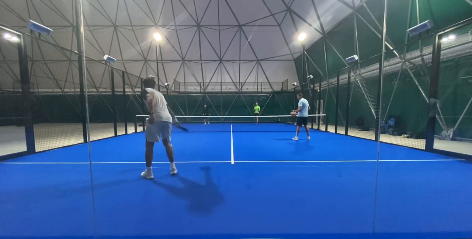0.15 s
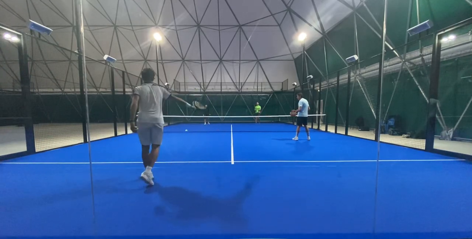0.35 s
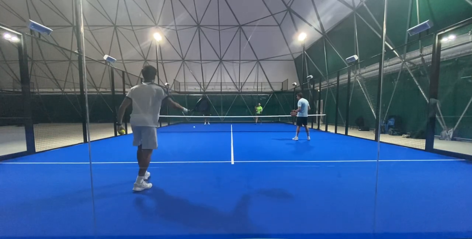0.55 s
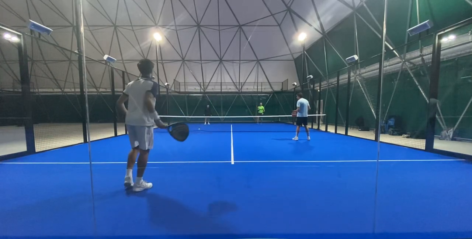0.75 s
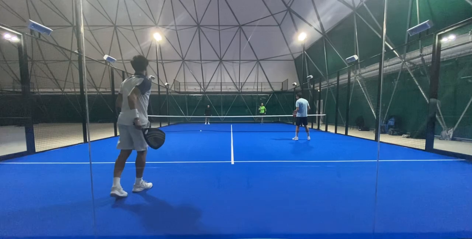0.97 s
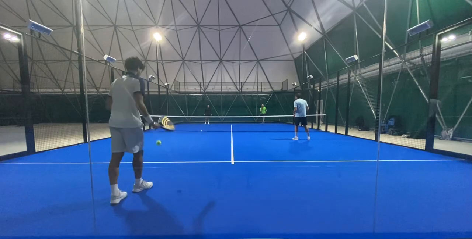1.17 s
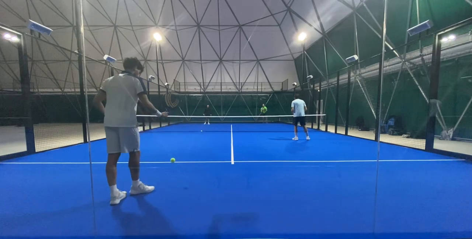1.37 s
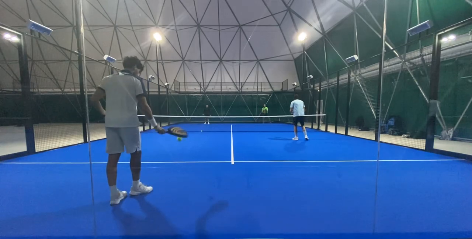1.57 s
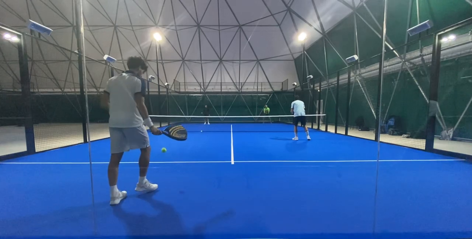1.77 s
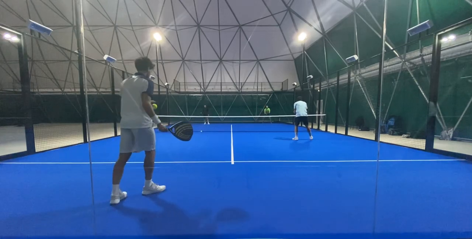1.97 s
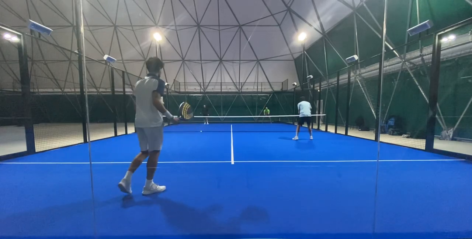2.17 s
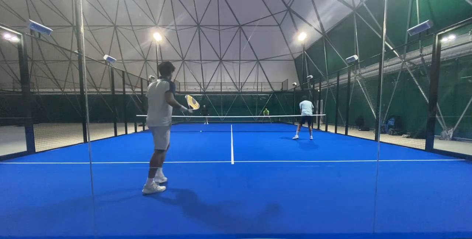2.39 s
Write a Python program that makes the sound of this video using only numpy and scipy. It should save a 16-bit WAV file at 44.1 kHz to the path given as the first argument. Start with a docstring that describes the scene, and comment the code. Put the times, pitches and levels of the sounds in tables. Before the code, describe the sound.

One loud racket pop right at the start, heard from a distance in a big hard-walled indoor court, blooms into long reverberation; later two dull bounces, the second barely audible, above a low wavering hum.

```python
"""Racket strike in a domed hall

A racket strikes a ball some way off in a large domed sports hall; two soft bounces follow.
Each knock is decaying modes plus a click. Its direct sound is weak: walls and roof send back
bunched echoes of shaped noise, then a long tail that dulls as it dies.
Ventilation hums low, as wavering sines, under the steady filtered-noise wash of the hall."""
import sys
import numpy as np
from scipy import signal
from scipy.fft import rfft, irfft
from scipy.io import wavfile
from scipy.ndimage import uniform_filter1d

SR = 44100
rng = np.random.default_rng(int(sys.argv[2]) if len(sys.argv) > 2 else 0)


def transcribe(u):
    """Save the signal u as a 16-bit wav file named by the first command-line argument.

    u: samples, shape (n,) or (channels, n), limited to [-1, 1]; the rate is SR.
    q: integer samples, one column per channel.
    """
    v = np.clip(np.atleast_2d(u).T, -1, 1)
    q = np.round(v * 32767).astype(np.int16)
    wavfile.write(sys.argv[1], SR, q)


def undo_db(level):
    """Turn decibels back into plain size, where 20 dB means ten times bigger."""
    steps = np.asarray(level, float) / 20
    return 10 ** steps


N = 107295  # samples, about 2.4 s


def evened(x):
    """Scales a sound to an rms of one."""
    return x / np.sqrt(np.mean(x ** 2) + 1e-20)


def unit(x):
    """Scales a sound to an energy of one."""
    return x / np.linalg.norm(x)


def read(points, hz):
    """Reads a curve of (Hz, value) points along a logarithmic frequency axis."""
    f, value = np.transpose(points)
    return np.interp(np.log(hz + 1), np.log(f + 1), value)


def panned(level_db, pan_db):
    """Left and right gains for a level and a left-minus-right difference."""
    return undo_db(level_db + np.array([[pan_db], [-pan_db]]) / 2)


def slow_waver(rate_hz):
    """Irregular waver of unit rms: twelve sines with random phases, up to the given rate."""
    t = np.arange(N)[:, None] / SR
    rates = np.geomspace(0.1, 1, num=12) * rate_hz
    return evened(np.sin(2 * np.pi * (rates * t + rng.random(12))).sum(1))


def noise_pair(shape):
    """Stereo noise, most alike in the bass, coloured over time by shape(hz, seconds) in dB."""
    # likeness of left and right: hz, correlation
    likeness = [(60, 0.77), (130, 0.92), (270, 0.76), (570, -0.26), (1200, -0.15), (2540, 0.043),
                (5400, 0.059), (11400, -0.031)]
    patchy_db = 1.5
    frames, hz = N // 256 + 5, np.fft.rfftfreq(1024, 1 / SR)[:, None]
    a, b, c, d, patches = rng.standard_normal((frames, 513, 5)).T
    patches = uniform_filter1d(uniform_filter1d(patches, size=10, axis=0), size=10, axis=1)
    same = np.clip(read(likeness, hz), -1, 1)
    left = a + 1j * b
    right = same * left + np.sqrt(1 - same ** 2) * (c + 1j * d)
    level_db = shape(hz, np.arange(frames) * 256 / SR) + patchy_db * evened(patches)
    spectra = np.array([left, right]) * undo_db(level_db)
    return signal.istft(spectra, nperseg=1024, noverlap=768)[1][:, :N]


def ventilation():
    """Low hum of a gliding tone and fainter wavering ones, over a steady wash of coloured noise."""
    # path of the main hum: time_s, pitch_hz, level_db
    main_hum = [(0.0, 57.65, -37), (0.68, 56.65, -43), (0.801, 57.2, -38.5), (0.83, 59.8, -64.5),
                (0.99, 67.92, -38), (1.18, 69.96, -38), (1.38, 70.16, -37.5), (1.5, 73.1, -41),
                (1.541, 68.5, -52), (1.61, 61.2, -41), (1.73, 64.5, -39.5), (1.851, 61, -46),
                (1.979, 53.5, -41.5), (2.079, 52, -42), (2.13, 57, -35), (2.19, 62.6, -41), (2.43, 63, -53)]
    # fainter tones: pitch_hz, level_db, waver_hz (rms)
    faint_hums = [(46.7, -48, 2.4), (104.7, -52, 5.34), (132.7, -63.5, 10)]
    # colour of the wash: hz, relative_db
    wash_colour = [(18, -59.5), (25, -39), (48, -7), (70, 2.5), (102, -4.5), (183, -12.5), (305, -13.5),
                   (387, -23), (600, -22.5), (800, -16), (1470, -23.5), (2500, -34), (4000, -47.5),
                   (6500, -61.5), (9000, -68), (12000, -76), (16000, -110)]
    wash_db, throb_db = -39, 0.5  # overall rms of the wash; rms throb of each tone
    waver_rate_hz, throb_rate_hz = 8.1, 27.0
    time_s, pitch_hz, level_db = np.transpose(main_hum)
    t = np.arange(N) / SR
    tones = [(np.interp(t, time_s, pitch_hz), np.interp(t, time_s, level_db))]
    for f, db, waver_hz in faint_hums:
        tones.append((f + waver_hz * slow_waver(waver_rate_hz), db))
    hum = 0
    for f, db in tones:
        gain = np.sqrt(2) * undo_db(db + throb_db * slow_waver(throb_rate_hz))
        hum = hum + gain * np.sin(2 * np.pi * np.cumsum(f) / SR)
    wash = evened(noise_pair(lambda hz, s: read(wash_colour, hz) + 0 * s))
    return hum + undo_db(wash_db) * wash


def hall(echoes_db):
    """Paths for ring, thud and crack: bunched echoes that lose treble on the way, and a long tail."""
    # bunches of echoes: delay_s, length_s, left_minus_right_db, ring_db, thud_db, crack_db
    echoes = [(.005, 0.016, -1, 2.5, -1, -13.5), (0.015, 0.018, 4, 2, 2, -16),
              (0.027, 0.0075, -1, -2, -9, -17), (0.034, 0.011, -6, -7.5, -19, -2),
              (.056, 0.011, -1, -19, -14, -1.5), (.059, 0.027, -10.5, 0, -8, -12),
              (0.074, 0.013, -5, -5, -18, -15.5), (.1, 0.0077, -5, -22, -4.5, -23),
              (0.112, 0.0068, -4.5, -25, -19, 0), (.133, 0.013, 1, -12, 4.5, -11.5),
              (.163, .012, -10.5, -3, -11, -6), (.172, 0.011, 4, 1.5, -10, -17),
              (0.181, .014, -6.5, -1.5, -11, -15), (0.19, 0.018, -14.5, 4.5, 0, -17),
              (0.199, 0.026, 5, 3.5, -6, -16), (0.233, .023, -2, 5, -1.5, -23),
              (0.382, .05, -6, -6.5, -2, -19), (0.55, 0.067, 6.5, -4, -24, -23)]
    # decay of the hall: hz, t60_s
    decay = [(150, 2.6), (300, 1.94), (600, 4.83), (1000, 4.05), (2000, 4.33), (4000, 2.89), (7000, 1.36),
             (11000, 0.8), (15000, 0.54)]
    # for ring, thud, crack: level of the tail, and of the clean first reflection against its bunch
    mix_db = [(7.5, 0.5), (-15.5, 4), (13.5, -19.5)]
    tail_build_s = 0.067
    echo_rise = 0.18  # share of a bunch's length
    far_lag = 20  # samples by which the quieter, far side hears a first reflection later
    t = np.arange(N) / SR
    tail = noise_pair(lambda hz, s: -60 * s / read(decay, hz))
    tail = tail / np.linalg.norm(tail[0]) * (1 - np.exp(-t / tail_build_s))

    def treble_loss(hz, s):
        return np.minimum(60 * s * (1 / read(decay, 1000) - 1 / read(decay, hz)), 0)

    taps = noise_pair(treble_loss)
    taps = taps / taps[:, :8192].std()
    bunches, first_taps = [], []
    for delay_s, length_s, pan_db, *_ in echoes:
        age = np.maximum(t[:SR] - delay_s, 0) / length_s
        bunches.append(unit((1 - np.exp(-age / echo_rise)) * np.exp(-2 * age)))
        far = np.array([[pan_db < 0], [pan_db >= 0]])
        first_taps.append(np.arange(N) == round(delay_s * SR) + far * far_lag)
    paths = []
    for part, (tail_db, first_db) in enumerate(mix_db):
        gains = [panned(echoes_db + row[3 + part], row[2]) for row in echoes]
        power = sum((bunch * gain) ** 2 for bunch, gain in zip(bunches, gains))
        diffuse = taps * np.sqrt(np.pad(power, ((0, 0), (0, N - SR))))
        firsts = sum(gain * tap for gain, tap in zip(gains, first_taps))
        paths.append(diffuse + undo_db(tail_db) * tail + undo_db(first_db) * firsts)
    return paths


def ring(modes, swell_s):
    """Modes that swell together while each decays, cleared of bass below the lowest."""
    t = np.arange(8192) / SR
    swell = np.sin(np.pi / 2 * np.minimum(t / swell_s, 1)) ** 2
    sound = swell * sum(undo_db(db - 60 * t / t60) * np.sin(2 * np.pi * hz * t) for hz, db, t60 in modes)
    low_cut = signal.butter(2, min(modes)[0] / 2, "high", fs=SR, output="sos")
    return unit(signal.sosfilt(low_cut, sound))


def crack(top_hz):
    """One click with a causal, minimum-phase colour; a soft knock has a duller one."""
    # colour of the crack: hz, relative_db
    crack_colour = [(88, -45), (150, -22.5), (279, -5.5), (388, -6), (569, -13.5), (835, -10), (1390, -10),
                    (2200, -18.5), (3500, -25), (5000, -29.5), (7000, -29.5), (9000, -39.5), (11800, -47),
                    (13500, -57.5), (15400, -58), (22000, -110)]
    hz = abs(np.fft.fftfreq(8192, 1 / SR))
    log_gain = read(crack_colour, hz) * np.log(10) / 20 - np.log(1 + (hz / top_hz) ** 4) / 2
    spectrum = np.exp(np.conj(signal.hilbert(log_gain)))
    return unit(np.fft.ifft(spectrum).real[:4096])


def hit(knock, ring_modes, thud_modes, contact_s, top_hz):
    """A knock of the ball as it arrives through the hall; only ring and thud arrive straight."""
    start_s, level_db, direct_db, pan_db, echoes_db, thud_db, crack_db = knock
    direct = panned(direct_db, pan_db) * (np.arange(N) == 0)
    ring_path, thud_path, crack_path = hall(echoes_db)
    routes = [
        (ring_path + direct, ring(ring_modes, contact_s)),
        # the low push has its own swell time
        (thud_path + direct, undo_db(thud_db) * ring(thud_modes, 0.0052)),
        (crack_path, undo_db(crack_db) * crack(top_hz)),
    ]
    sound = sum(signal.fftconvolve(path, part[None])[:, :N] for path, part in routes)
    return undo_db(level_db) * np.pad(sound, ((0, 0), (round(start_s * SR), 0)))[:, :N]


def soft_bounces():
    """A hollow ball meets the floor: long contact, few modes and a dull click."""
    # bounces: start_s, level_db, direct_db, left_minus_right_db, echoes_db, thud_db, crack_db
    knocks = [(1.591, -20, 9.6, -7, -5.5, -5, 2.5), (2.386, -35, 2.4, 0, -16.5, -2, -16)]
    # ring of the hollow ball: hz, relative_db, t60_s
    ball_modes = [(885, 5, 0.035), (1180, -12, 0.033)]
    # thud of ball and floor: hz, relative_db, t60_s
    floor_modes = [(112, -3, 0.23), (223, -1, 0.12), (301, -3, 0.072)]
    return sum(hit(row, ball_modes, floor_modes, contact_s=0.0068, top_hz=2430) for row in knocks)


def racket_strike():
    """A racket meets the ball: brief contact, many ringing modes and a bright crack."""
    # strikes: start_s, level_db, direct_db, left_minus_right_db, echoes_db, thud_db, crack_db
    knocks = [(0.0553, -0.5, -9.5, 5, -1.5, -7, 2.5)]
    # ring of ball and racket face: hz, relative_db, t60_s
    racket_modes = [(778, 3.5, 0.036), (846, 4.5, 0.035), (1002, 1.5, 0.029), (1180, -5.5, 0.045),
                    (1973, -12.5, .02), (3483, -14, 0.019)]
    # low push of the blow: hz, relative_db, t60_s
    push_modes = [(240, -10.5, 0.056), (269, 6, 0.06), (347, 7, 0.047), (409, 3, 0.039)]
    return sum(hit(row, racket_modes, push_modes, contact_s=0.0016, top_hz=16000) for row in knocks)


def scene():
    """Ventilation, the two bounces and the strike, summed."""
    return ventilation() + soft_bounces() + racket_strike()


def top_cut(x):
    """Nothing passes above the cut-off."""
    return signal.sosfilt(signal.butter(12, 15250, fs=SR, output="sos"), x)


def record(dry):
    """Two microphones that differ a little in colour and drop the deepest bass."""
    # colour difference of the microphones: hz, left_minus_right_db
    mic_difference = [(60, -1), (140, 0), (340, 1.5), (830, 2.5), (1980, 1.5), (4740, 4), (8000, 4.5),
                      (11400, -5.5)]
    lean_db = read(mic_difference, np.fft.rfftfreq(N, 1 / SR)) / 2
    heard = irfft(rfft(dry) * undo_db([lean_db, -lean_db]), N)
    low_cut = signal.butter(4, 34, "high", fs=SR, output="sos")  # Hz
    return top_cut(signal.sosfilt(low_cut, heard))


dry = scene()
out = record(dry)
transcribe(out)
```